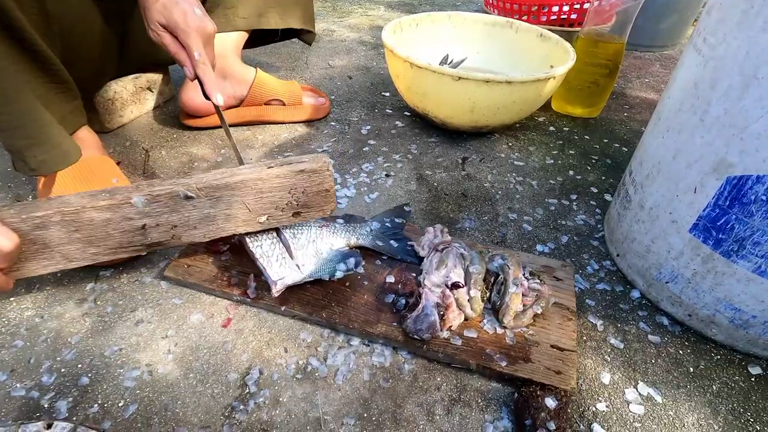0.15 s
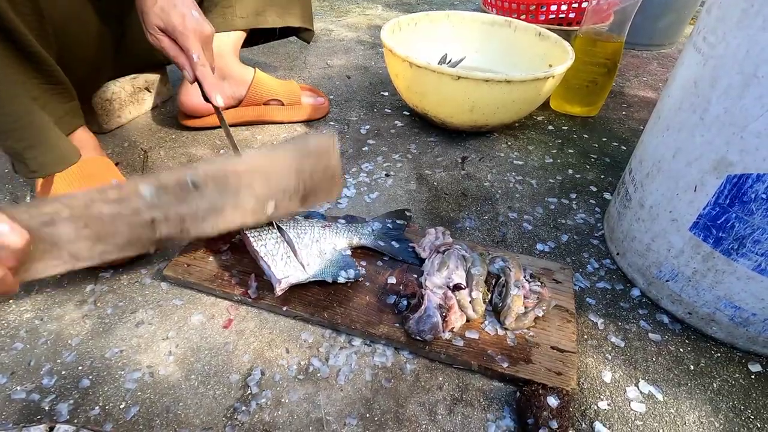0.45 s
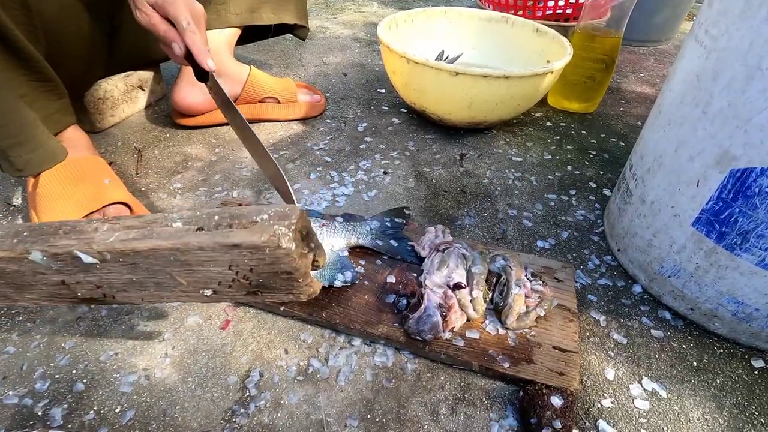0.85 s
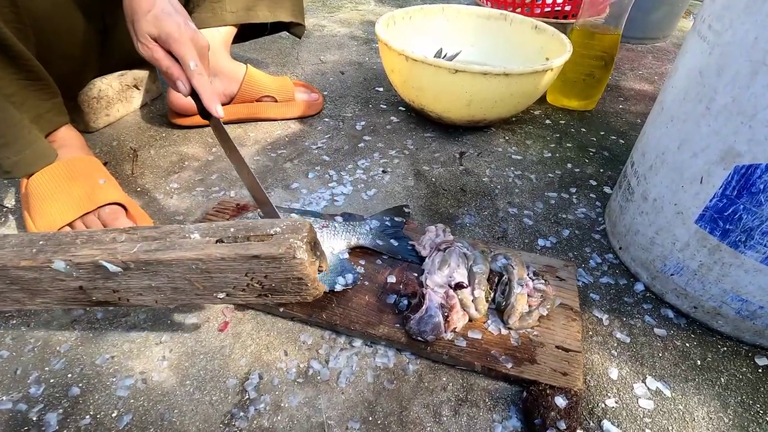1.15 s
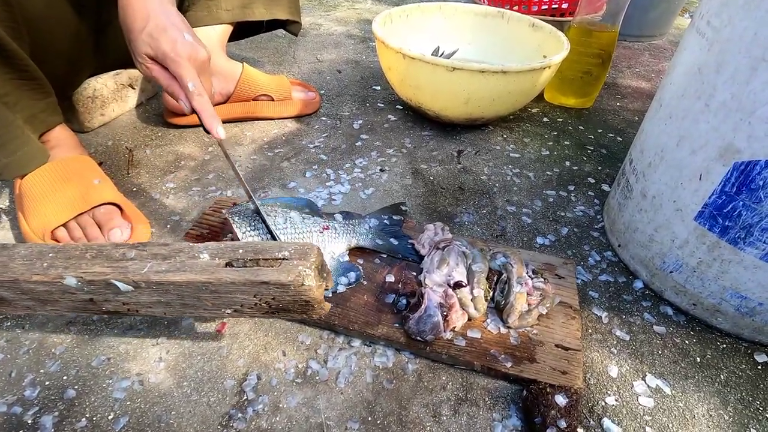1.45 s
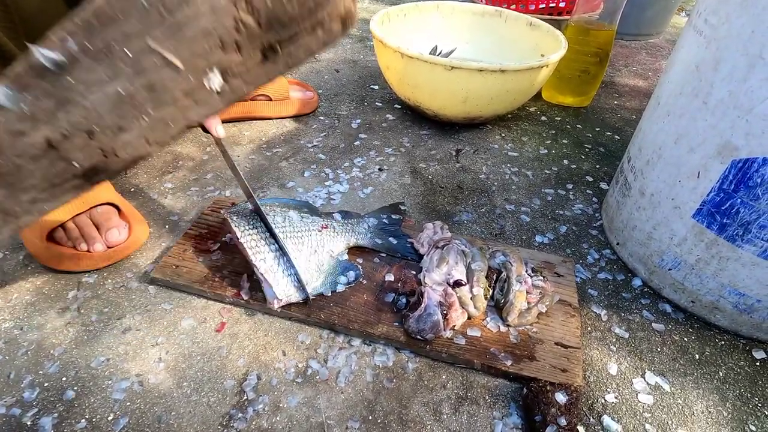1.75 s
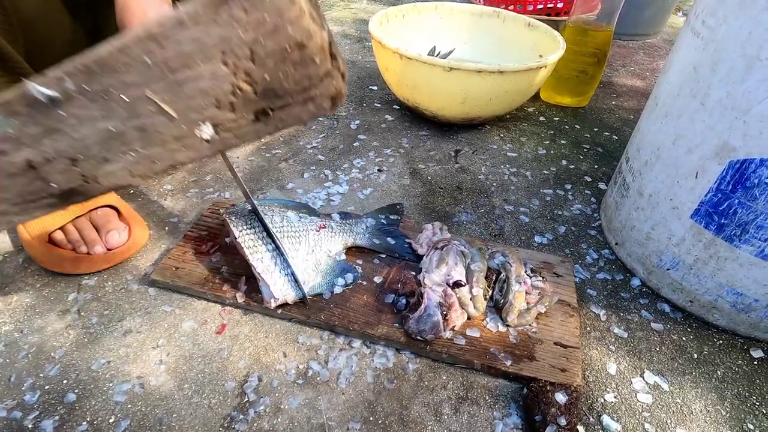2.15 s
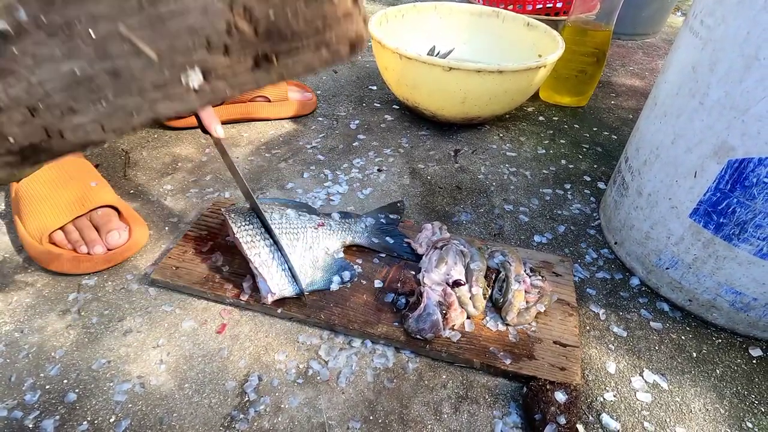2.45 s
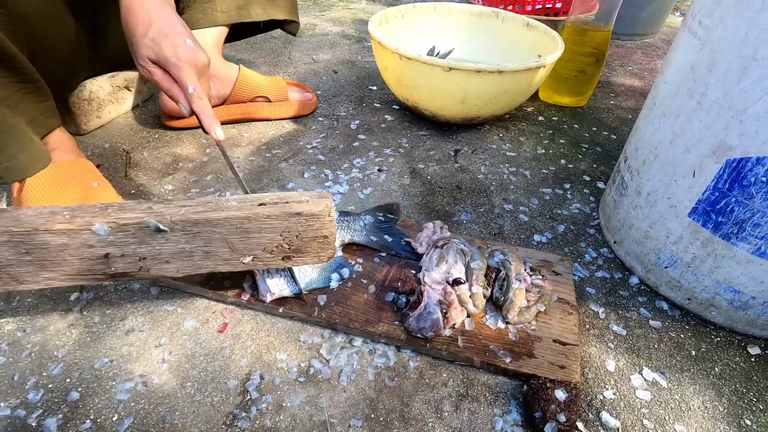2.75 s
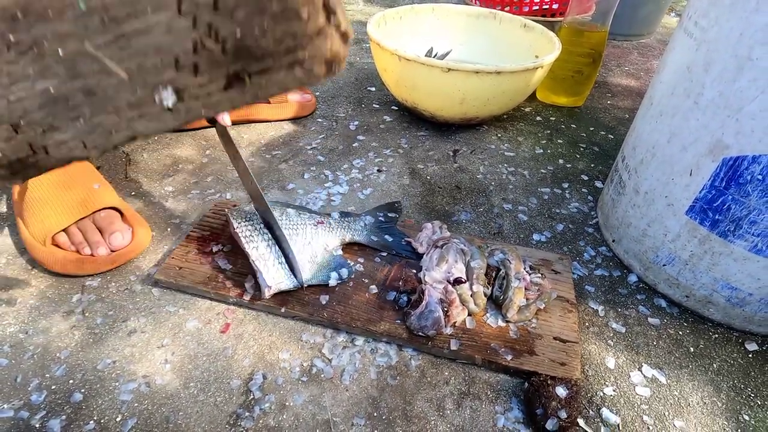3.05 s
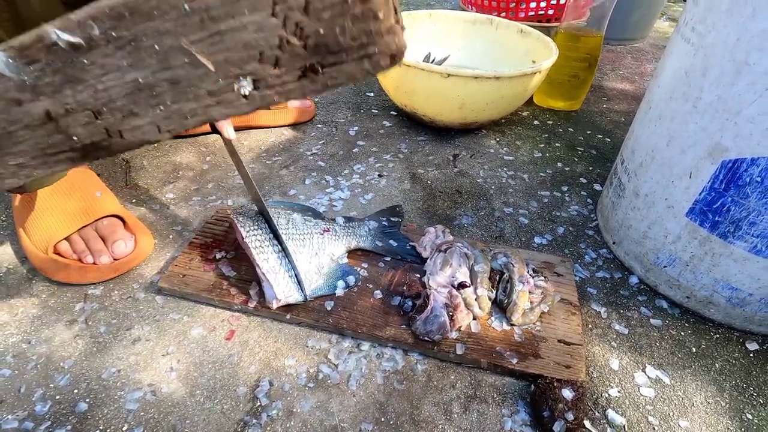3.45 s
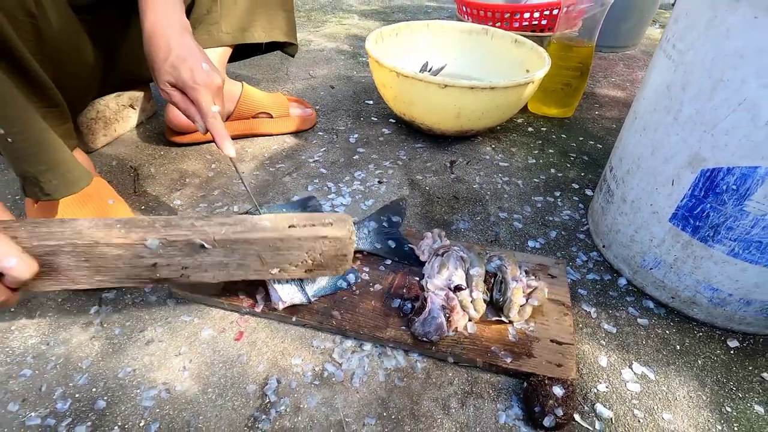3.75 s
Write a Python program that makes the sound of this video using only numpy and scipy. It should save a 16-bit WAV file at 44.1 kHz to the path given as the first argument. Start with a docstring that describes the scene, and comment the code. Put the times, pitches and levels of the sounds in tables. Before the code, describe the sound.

A wooden block strikes a knife through fish: two quick knocks, a pause with faint scraping and snaps, three steady blows, then a last one after a coarse rasp. Close microphone outdoors, peaks slightly overloaded.

```python
"""Six hard knocks, close up outdoors: a block of wood drives a knife through a fish on a wooden board.
Each blow rings block and blade as fading tones, crunches bone in grains of noise and thumps the board.
The block bounces, bone and scale snap, and the blade scrapes in swells of gritty noise, then rasps.
Weak reflections and a low rumble of shaped noise lie behind, and the knocks overload the microphone."""
import sys
import numpy as np
from scipy import signal
from scipy.fft import rfft, irfft
from scipy.io import wavfile

SR = 44100
rng = np.random.default_rng(int(sys.argv[2]) if len(sys.argv) > 2 else 0)


def wrap_up_sound(samples):
    """Save the sound to the file named by the first command line argument, as 16-bit audio."""
    columns = np.atleast_2d(samples).T
    # keep every value between -1 and 1, then stretch to whole-number steps
    tamed = np.clip(columns, -1, 1)
    steps = np.round(tamed * 32767).astype(np.int16)
    wavfile.write(sys.argv[1], SR, steps)


N = 171990  # length in samples
TIME = np.arange(N) / SR  # seconds from the start of the scene
AGE = np.arange(SR // 3) / SR  # seconds from the start of one short sound


def undb(db):
    """Turn decibels into a plain factor."""
    return 10 ** (np.asarray(db) / 20)


def unit(x):
    """Scale x to an average (rms) level of one."""
    return x / np.sqrt(np.mean(x ** 2))


def add(out, start, x):
    """Mix x into out from the start time in seconds."""
    i = max(int(start * SR), 0)
    out[i:i + len(x)] += x[:max(N - i, 0)]


def short_noise():
    """Plain noise as long as one short sound."""
    return rng.standard_normal(len(AGE))


def fade_in(seconds):
    """A soft start: the sound needs a moment to build up."""
    return 1 - np.exp(-AGE / seconds)


def die_away(t60):
    """A fade that drops by 60 dB in t60 seconds."""
    return np.exp(-np.log(1000) * AGE / t60)


def curve(points):
    """Join (seconds, value) points by straight lines over the whole scene."""
    seconds, value = np.array(points).T
    return np.interp(TIME, seconds, value)


def band(x, hz, spread=1.4, order=2):
    """Keep the pitches from hz / spread to hz * spread, at unit rms."""
    spread = max(spread, 1.05)
    edges = [min(hz / spread, SR * .4), min(hz * spread, SR * .47)]
    return unit(signal.sosfilt(signal.butter(order, edges, "band", fs=SR, output="sos"), x))


def soften(x, hz):
    """A softer contact: weaken the treble above hz."""
    return signal.sosfilt(signal.butter(3, hz, fs=SR, output="sos"), x)


def colour(x, points):
    """Give x a spectrum of (Hz, dB) points, at unit rms."""
    hz, db = np.array(points).T
    f = np.maximum(np.fft.rfftfreq(len(x), 1 / SR), 1)
    gain = undb(np.interp(np.log(f), np.log(hz), db))
    return unit(irfft(rfft(x) * gain, len(x)))


GRIT_DB = 3.5  # unevenness of the grains


def grains(count, size=40):
    """Noise broken into grains, each size samples long (40 is about a millisecond), of uneven strength."""
    luck = np.clip(rng.standard_normal(count // size + 1), -2, 2)
    strength = np.repeat(undb(GRIT_DB * luck), size)[:count]
    return unit(strength * rng.standard_normal(count))


def ring(hz, t60):
    """One tone of a struck object, dying away."""
    return np.sin(2 * np.pi * hz * AGE) * die_away(t60)


MODE_SCATTER_DB, PITCH_SCATTER = 4.2, 0.0094  # chance in each tone's level, and in its pitch as a share


def strike(modes, ratio):
    """Ring all tones of an object; each blow gives them slightly different levels and pitches."""
    chance = rng.standard_normal((len(modes), 2))
    out = np.zeros(len(AGE))
    sign = 1  # neighbouring tones start in opposite directions
    for (hz, db, t60), (level_luck, pitch_luck) in zip(modes, chance):
        pitch = hz * ratio * (1 + PITCH_SCATTER * pitch_luck)
        out += sign * undb(db + MODE_SCATTER_DB * level_luck) * ring(pitch, t60)
        sign = -sign
    return out


CLACK_DB, CLACK_HZ, CLACK_S = -2, 1230, .006  # level, centre pitch and fading time
# The tones of the wooden block.
# Each row: pitch in Hz, level in dB, time to die away by 60 dB in seconds.
BLOCK_TONES = [(490, -14, .045), (550, -5, .05), (645, -11, .045), (900, -8, .04), (1060, -9, .04),
               (1170, -8, .035), (1265, -7, .04), (1440, -12, .035), (1515, -4, .055), (1670, -17, .04),
               (2120, -15, .035), (2470, -15, .035)]


def knock(ratio):
    """Wood meets the spine of the knife: a dry clack of noise and the tones of the block."""
    clack = band(short_noise(), CLACK_HZ, spread=1.55) * np.exp(-AGE / CLACK_S) * fade_in(0.00094)
    return strike(BLOCK_TONES, ratio) + undb(CLACK_DB) * clack


# The tones of the steel blade.
# Each row: pitch in Hz, level in dB, time to die away by 60 dB in seconds.
BLADE_TONES = [(1590, -19, .22), (2030, -20, .22), (3250, 0, .04), (3612, 0, .045), (4500, -1, .04),
               (5130, 3, .04), (5330, 1, .04), (6280, -5, .035), (7270, -2, .035), (8800, -5, .03)]


def blade():
    """The struck blade rings in its own tones."""
    return strike(BLADE_TONES, 1)


CRUNCH_TAIL_DB, CRUNCH_TAIL_S = -18, 0.03


def crunch(hz, peak_s):
    """Bone gives way in a burst of grains, with a short wet tail."""
    u = AGE / peak_s
    burst = u * np.exp(1 - u)
    tail = undb(CRUNCH_TAIL_DB) * np.exp(-AGE / CRUNCH_TAIL_S)
    return band(grains(len(AGE)), hz, spread=1.524) * (burst + tail)


THUMP_LAG_S, PUSH_S = .0048, 0.0023  # delay after the knock, and time for the push to build up
BOARD_T60_S, UPPER_T60_S = 0.097, 0.0705  # 60 dB fading times of the low and upper tone
BOARD_UPPER_RATIO = 1.996  # pitch of the upper tone over the low one


def thump(hz, upper_db):
    """The board, pushed through the soft fish, bumps on the ground: two tones and a dull thud."""
    low = ring(hz, BOARD_T60_S)
    upper = undb(upper_db) * ring(hz * BOARD_UPPER_RATIO, UPPER_T60_S)
    thud = undb(-12) * band(short_noise(), hz=220, spread=2.6) * np.exp(-AGE / .012)
    return (low - upper + thud) * fade_in(PUSH_S)


CRUNCH_PEAK_S = .0036
# The six hard blows.
# Each row: start in seconds, knock level in dB, knock pitch ratio, thump level in dB, thump pitch in Hz,
# level of the board's upper tone in dB, crunch level in dB, crunch centre in Hz, blade level in dB.
BLOW_LIST = [(0.2212, -4.5, 1.03, 3, 111, -4, -10.5, 2760, -26),
             (0.5889, -3, .96, 5, 107.7, -11.5, -13.5, 5950, -14),
             (1.944, 1.5, 1.0, 4, 103.3, -2, -15.5, 4180, -26),
             (2.34, -0.5, 1.013, 3, 104, -4, -15.5, 2650, -27),
             (2.7497, -1.5, 1.03, 3, 101.7, -3.5, -17.5, 2845, -24.5),
             (3.8067, -3.5, 0.93, 1, 97, -3.5, -12, 3700, -17)]


def blows():
    """Each blow knocks, crunches and rings the blade; the board's thump follows a moment later."""
    out = np.zeros(N)
    for (start, knock_db, ratio, thump_db, thump_hz, upper_db,
         crunch_db, crunch_hz, blade_db) in BLOW_LIST:
        hit = undb(knock_db) * knock(ratio)
        hit += undb(crunch_db) * crunch(crunch_hz, CRUNCH_PEAK_S)
        hit += undb(blade_db) * blade()
        add(out, start, hit)
        add(out, start + THUMP_LAG_S, undb(thump_db) * thump(thump_hz, upper_db))
    return out


BOUNCE_HZ, BOUNCE_UPPER_DB, BOUNCE_CRUNCH_S = 105, 0.5, .0015  # thump pitch, upper tone, crunch peak time
# The block bouncing after a blow.
# Each row: start in seconds, knock level in dB, pitch in Hz above which the knock is softened,
# thump level in dB, crunch level in dB.
BOUNCE_LIST = [(0.3151, -7, 1380, -8.5, -26), (0.67, -25.5, 2480, -18, -30.5), (2.018, -33, 1980, -21, -35),
               (2.381, -24, 1600, -15, -34), (2.412, -26.5, 2050, -15.5, -31.5),
               (2.792, -26, 2500, -16.5, -31.5), (2.8214, -25.5, 2000, -19, -35)]


def bounces():
    """The block lands again with a softer, duller knock, a small crunch and a thump."""
    out = np.zeros(N)
    for start, knock_db, top_hz, thump_db, crunch_db in BOUNCE_LIST:
        hit = undb(knock_db) * soften(knock(0.9), top_hz)
        hit += undb(crunch_db) * crunch(hz=3100, peak_s=BOUNCE_CRUNCH_S)
        add(out, start, hit)
        add(out, start + THUMP_LAG_S, undb(thump_db) * thump(BOUNCE_HZ, BOUNCE_UPPER_DB))
    return out


SNAP_S, SNAP_ATTACK_S = .004, .0005  # fading and starting time
# Small snaps of bone and scale.
# Each row: start in seconds, level in dB, centre pitch in Hz.
SNAP_LIST = [(0.263, -26, 5260), (.544, -22, 5300), (0.794, -38, 4100), (.974, -40, 3910),
             (1.128, -17.5, 2315), (1.279, -18.5, 2550), (1.531, -34, 3300), (1.984, -35.5, 3080),
             (2.040, -34.5, 4240), (2.102, -44.5, 5940), (3.104, -37.5, 3120), (3.162, -44, 5030),
             (3.259, -43, 4250)]


def snaps():
    """Bone or scale breaks: a tiny burst of noise that fades at once."""
    out = np.zeros(N)
    for start, db, hz in SNAP_LIST:
        snap = band(short_noise(), hz, spread=1.51) * np.exp(-AGE / SNAP_S) * fade_in(SNAP_ATTACK_S)
        add(out, start, undb(db) * snap)
    return out


SCRAPE_BODY_DB, SCRAPE_BODY_HZ = -4, 1400
SCALE_TICK_DB, SCALE_TICKS_PER_S = 9, 90
# The blade sliding in the fish.
# Each row: time of the peak in seconds, rise in seconds, fall in seconds, level in dB, centre in Hz.
SCRAPE_LIST = [(.01, 0.017, 0.036, -41.5, 4200), (0.134, .035, 0.24, -40.5, 4230),
               (.35, 0.034, 0.039, -42.5, 4170), (.49, 0.021, 0.12, -44, 3400),
               (0.557, 0.03, 0.15, -39.5, 5000), (.78, 0.034, 0.02, -79, 4930),
               (1.124, 0.019, 0.044, -30, 3700), (1.225, 0.0083, 0.0076, -37.5, 2200),
               (1.284, 0.033, 0.059, -36.5, 3800), (1.52, 0.084, 0.22, -49, 3850),
               (1.647, 0.026, 0.027, -29.5, 4040), (1.797, 0.06, 0.039, -34, 4440),
               (2.18, 0.0067, 0.27, -48.5, 3900), (3.36, 0.2, 0.23, -54, 4410)]


def scraping():
    """Scales slip and tick past the blade in gritty swells, with some body from the flesh and board."""
    out = np.zeros(N)
    body = undb(SCRAPE_BODY_DB) * band(grains(N), SCRAPE_BODY_HZ, spread=3.1)
    tick_starts = rng.random(N) < SCALE_TICKS_PER_S / SR
    ticks = np.convolve(tick_starts, np.exp(-np.arange(200) / 35))[:N]  # each fades in under 1 ms
    for peak, rise, fall, db, hz in SCRAPE_LIST:
        before, after = np.minimum(TIME - peak, 0), np.maximum(TIME - peak, 0)
        swell = np.exp(-(before / rise) ** 2 - after / fall)
        grit = rng.standard_normal(N) * (1 + undb(SCALE_TICK_DB) * ticks)
        out += undb(db) * swell * (band(grit, hz, spread=1.533) + body)
    return out


RASP_FLUTTER_DB, RASP_SLIP_S, CATCH_S = 2.2, .004, .002  # flutter size and step, width of a catch
# A coarse rasp as the block swings down for the last blow. Each row: time in seconds, level in dB.
RASP_LEVEL = [(3.575, -53), (3.595, -29), (3.635, -24), (3.68, -20.5), (3.72, -23.5), (3.78, -23.5),
              (3.803, -20), (3.815, -5.5), (3.84, -100)]
# Where the rasp catches. Each row: time in seconds, extra level in dB.
RASP_CATCHES = [(3.622, 7), (3.647, 13), (3.678, 9), (3.697, 10), (3.7015, 11), (3.750, 5)]
# The tone colour of the rasp. Each row: pitch in Hz, level in dB.
RASP_SPECTRUM = [(59, -41), (100, -19), (227, -3), (399, -14), (472, -11), (764, -12), (1460, 0.5),
                 (1840, -8), (2420, -8.5), (5480, -18), (12400, -34), (15000, -39)]


def rasp():
    """Rough rubbing: grains of noise that flutter, and catch and slip a few times."""
    seconds, level = np.array(RASP_LEVEL).T
    db = np.interp(TIME, seconds, level, left=-200, right=-200)  # silent outside the table
    slips = np.arange(0, TIME[-1], RASP_SLIP_S)
    db = db + RASP_FLUTTER_DB * np.interp(TIME, slips, rng.standard_normal(len(slips)))
    for when, catch_db in RASP_CATCHES:
        db = db + catch_db * np.exp(-((TIME - when) / CATCH_S) ** 2)
    return undb(db) * colour(grains(N, size=70), RASP_SPECTRUM)


# Reflections, band by band.
# Each row: centre pitch in Hz, level in dB, time to die away by 60 dB in seconds.
YARD_BANDS = [(150, -73, 0.45), (417, -25, 0.53), (1300, -21.5, 0.36), (2780, -19.5, 0.29),
              (6940, -9.5, 0.14)]


def yard(x):
    """Weak scattered reflections from ground and walls: x is smeared by fading noise."""
    tail = np.zeros(len(AGE))
    for hz, db, t60 in YARD_BANDS:
        tail += undb(db) * band(short_noise(), hz) * die_away(t60) * np.sqrt(hz / t60)
    return signal.fftconvolve(x, 5 * tail * fade_in(0.002) / SR)[:N]


# The tone colour of the outdoor background. Each row: pitch in Hz, level in dB.
AIR_SPECTRUM = [(15, -49.5), (25, -7), (90, -3), (207, -13), (286, -16), (450, -25), (488, -22), (529, -23),
                (790, -29.5), (978, -28), (1350, -30.5), (1810, -33), (4750, -42), (15000, -63)]
# How loud the background is. Each row: time in seconds, level in dB.
AIR_LOUDNESS = [(0, -29), (.45, -33), (.9, -37), (1.4, -34), (1.8, -30), (2.2, -32.5), (2.6, -38.5),
                (3.05, -39.5), (3.4, -38), (3.9, -32)]


def air():
    """A distant rumble of shaped noise that slowly swells and sinks."""
    return colour(rng.standard_normal(N), AIR_SPECTRUM) * undb(curve(AIR_LOUDNESS))


YARD_WIDTH, RASP_WIDTH, AIR_WIDTH = 0.94, 0.36, .12  # sideways share of each sound at full width
# The stereo picture is narrow at first and opens later. Each row: time in seconds, share of full width.
STEREO_OPENING = [(0, 0.058), (2.1, 0.034), (2.6, 0.29), (3.3, 1), (3.9, 0.39)]


def scene():
    """Every source sounds from the middle; reflections, rubbing and rumble also spread to the sides."""
    near = blows() + bounces() + snaps() + scraping() + rasp()
    side = YARD_WIDTH * yard(near) + RASP_WIDTH * rasp() + AIR_WIDTH * air()
    side = side * curve(STEREO_OPENING)
    middle = near + yard(near) + air()
    return middle + side * np.array([[1], [-1]])  # left adds the side, right subtracts it


CLIP_KNEE, TOP_HZ = 17, 15500  # a high knee bends only the peaks; nearly nothing passes above the top
# The microphone's tone colour. Each row: pitch in Hz, level in dB.
MIC_COLOUR = [(0, 1.5), (6000, -4), (9000, -2), (10500, -6), (14000, -4.5), (15500, -27)]


def record(dry):
    """The microphone dulls the treble, and flattens any peak that overloads it."""
    hz, db = np.array(MIC_COLOUR).T
    gain = undb(np.interp(np.fft.rfftfreq(2 * N, 1 / SR), hz, db))
    heard = irfft(rfft(dry, 2 * N) * gain)[:, :N]
    clipped = heard / (1 + np.abs(heard) ** CLIP_KNEE) ** (1 / CLIP_KNEE)
    return signal.sosfilt(signal.ellip(10, .1, 80, TOP_HZ, fs=SR, output="sos"), clipped)


dry = scene()
out = record(dry)
wrap_up_sound(out)
```